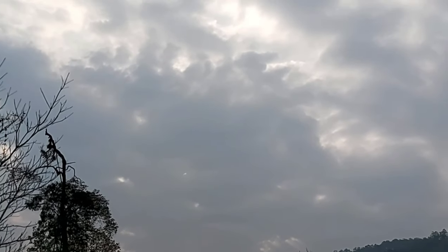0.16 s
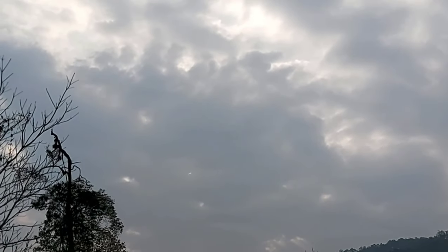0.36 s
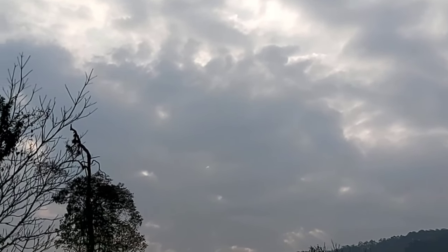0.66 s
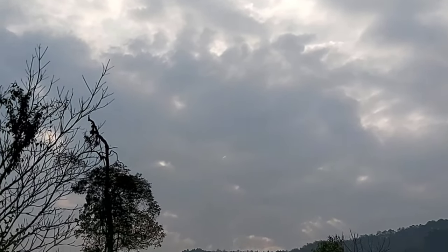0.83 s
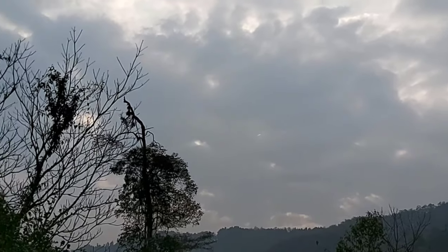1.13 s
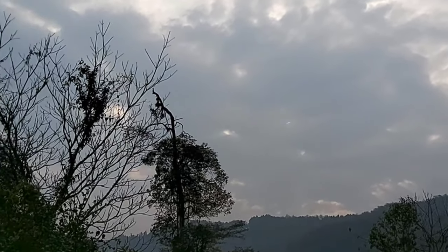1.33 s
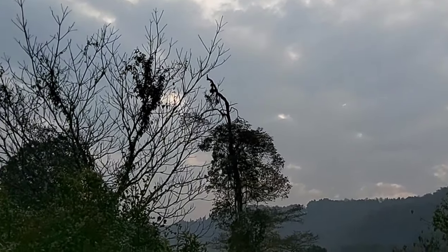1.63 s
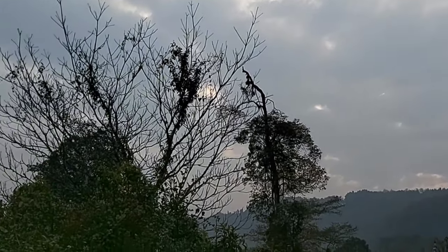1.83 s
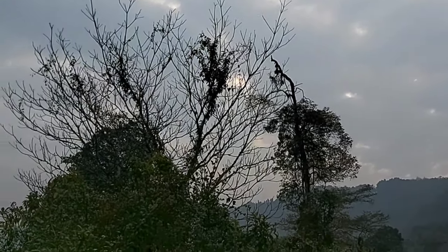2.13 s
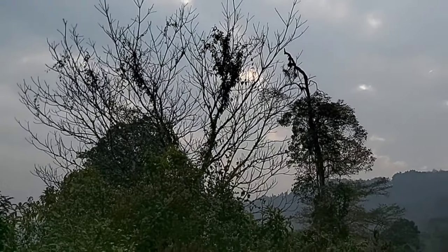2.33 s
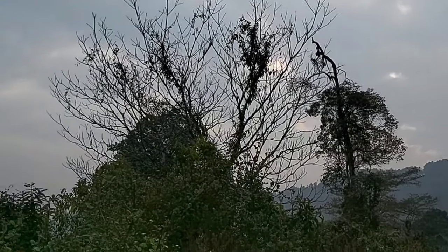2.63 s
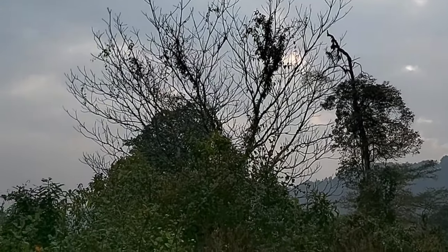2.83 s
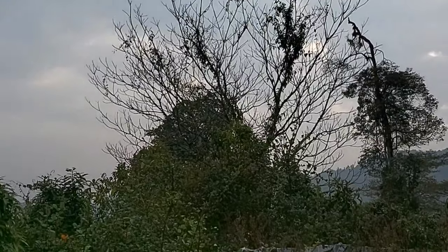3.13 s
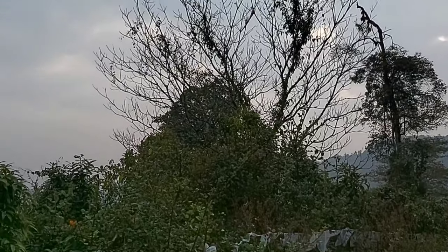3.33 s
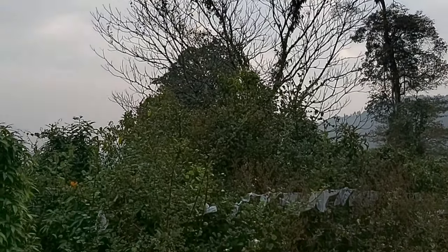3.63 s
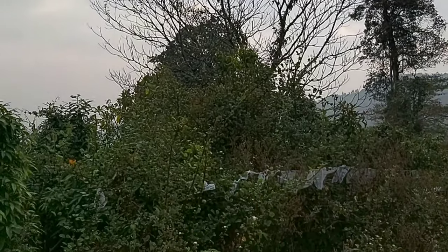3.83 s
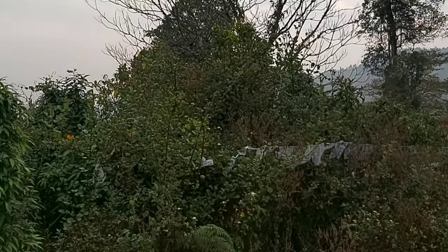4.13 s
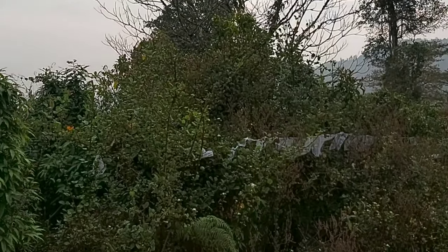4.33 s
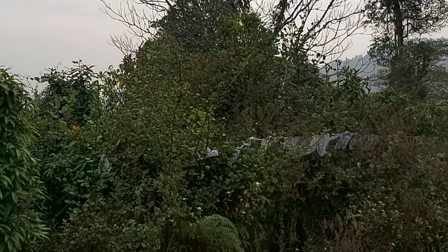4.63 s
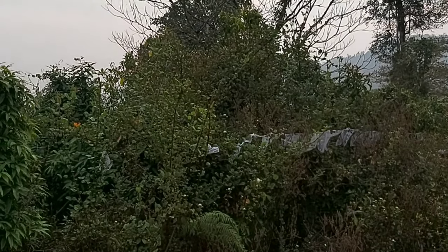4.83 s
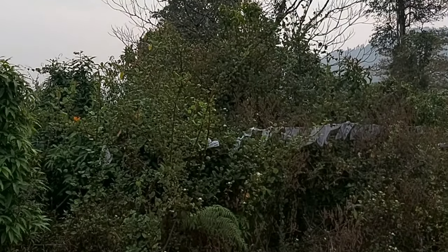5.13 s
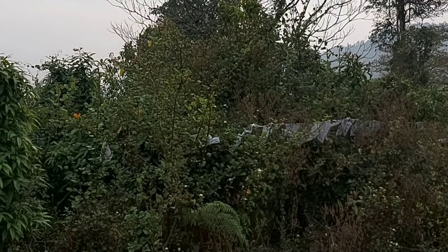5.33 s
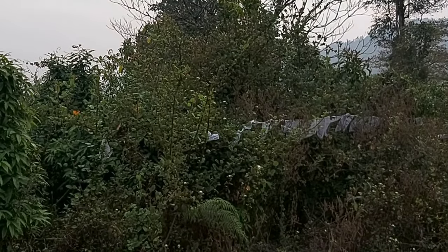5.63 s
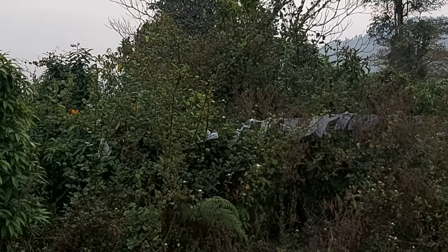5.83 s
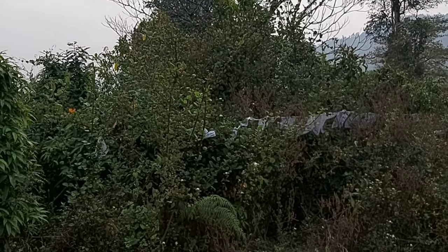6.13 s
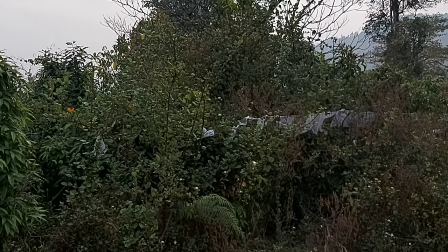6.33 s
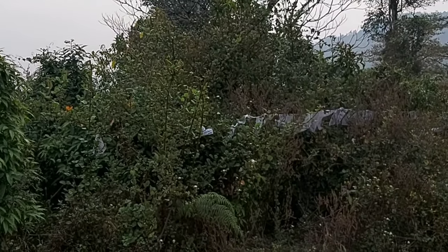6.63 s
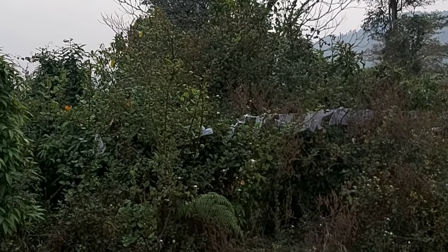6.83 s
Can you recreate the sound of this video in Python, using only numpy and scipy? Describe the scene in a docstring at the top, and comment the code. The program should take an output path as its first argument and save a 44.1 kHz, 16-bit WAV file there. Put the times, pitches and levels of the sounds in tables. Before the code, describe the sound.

Thrush-like birds whistle and warble close by without pause, roosters crow down the slope early on, and wind thumps the handheld microphone.

```python
"""A wooded hillside in the morning, heard by a handheld phone: thrush-like whistlers and a thin high warbler
sing close by, roosters crow down the slope, far birds blur among the trees and gusts thump the microphone.
Voices are sines that follow tables of pitch and level, with their pitch and level shaken by random walks.
Wind, hush, breath and scolds are shaped noise; the trees and the ground add delayed copies of the voices."""
import sys
import numpy as np
from scipy import signal
from scipy.fft import rfft, irfft
from scipy.io import wavfile
from scipy.ndimage import uniform_filter1d

SR = 44100
rng = np.random.default_rng(int(sys.argv[2]) if len(sys.argv) > 2 else 0)


def inscribe(sig):
    """Save sig as 16-bit PCM at rate SR to the path in sys.argv[1].

    A 1-D sig is mono; a 2-D sig holds one channel per row.
    Samples are clipped to [-1, 1] before scaling.
    """
    pcm = np.round(np.clip(np.atleast_2d(sig).T, -1, 1) * 32767)
    wavfile.write(sys.argv[1], SR, pcm.astype(np.int16))


N = 307377
T = np.arange(N) / SR  # time [s]

# spectrum of the steady hush: (frequency [Hz], relative density [dB per Hz])
AIR_SPECTRUM = [(20, -30), (35, 2), (70, -2), (200, -7), (320, -4), (500, -11), (950, -16.5), (1400, -12.5),
                (2500, -9), (4000, -22), (7000, -28.5), (8500, -32), (12200, -24.5), (15400, -26.5)]
AIR_DB = -64.5

# gusts on the microphone: (arrival [s], duration [s], level [dB])
GUSTS = [(1.55, 0.29, -51), (1.905, 0.05, -50.5), (1.981, 0.2, -42.5), (2.406, 0.08, -59),
         (3.1, 0.13, -68.5), (3.414, .22, -49), (3.766, 0.13, -60), (5.874, 0.049, -57.5)]
GUST_RISE_S, GUST_FALL_S, BREEZE_DB = 0.0028, 0.041, -78.5
# single puffs on the microphone: (time [s], level [dB])
THUMPS = [(1.038, -45.5), (1.183, -52), (1.831, -23), (1.876, -37), (5.84, -43)]
THUMP_HZ, THUMP_S = 70, .0062

# crowds of far singers: (time [s], hooting voices [dB], low voices [dB], high voices [dB])
CHORUS_LEVELS = [(0, -74, -57, -77), (0.7, -59, -62.5, -81.5), (1.2, -54, -49, -75.5),
                 (1.599, -59, -52.5, -72), (1.999, -56.5, -55.5, -78.5), (2.599, -57, -63, -80.5),
                 (3.301, -63, -70, -71.5), (4.001, -66.5, -59, -61), (4.599, -59, -60, -63.5),
                 (5.2, -73, -57, -83.5), (5.6, -62.5, -58.5, -66), (5.95, -77, -66.5, -90),
                 (6.4, -73, -80, -82), (6.97, -70, -79, -75.5)]
# bouts of thin far twitter: (start [s], end [s], level [dB])
TWITTER_BOUTS = [(.8, 1.8, -80.5), (2.9, 3.2, -83), (5.87, 6.55, -76), (6.68, 7, -73)]
BOUT_EDGE_S, TWITTER_REST_DB = 0.042, -85.5

# far hoots, mostly falling: (start [s], end [s], first pitch [Hz], last pitch [Hz], level [dB])
HOOTS = [(0.0, 0.2, 1274, 1387, -62.5), (2.97, 3.12, 1657, 1340, -66.5), (3.2, 3.44, 1397, 1304, -65.5),
         (3.42, 3.6, 1486, 1300, -70), (3.9, 4.03, 1567, 1180, -66), (4.3, 4.45, 1413, 1285, -67.5),
         (4.5, 4.72, 1338, 1170, -65), (4.8, 4.95, 1535, 1190, -68.5), (5.23, 5.38, 1537, 1346, -64),
         (5.4, 5.58, 1360, 1355, -66), (5.6, 5.74, 1310, 1260, -72.5), (5.68, 5.85, 1550, 1174, -73),
         (6.08, 6.16, 1330, 1080, -70.5), (6.08, 6.2, 1494, 1436, -69), (6.36, 6.48, 1407, 1153, -69),
         (6.48, 6.68, 1340, 1374, -67.5), (6.55, 6.64, 1446, 1490, -67.5), (6.7, 6.8, 1380, 1176, -65)]
# far thin seeps: (start [s], end [s], first pitch [Hz], last pitch [Hz], level [dB])
SEEPS = [(0.79, 0.84, 4280, 4400, -73), (1.01, 1.09, 3670, 3850, -67.5), (1.12, 1.2, 4470, 4310, -70.5),
         (2.45, 2.55, 4870, 4680, -72.5), (2.79, 2.86, 5510, 4820, -61), (6.05, 6.1, 5930, 5460, -72),
         (6.14, 6.2, 6400, 6380, -70), (6.53, 6.63, 5330, 5700, -71), (6.67, 6.75, 7260, 5820, -70)]

# near syllables, three tables with the same columns: clean whistles, burry notes, high warbles
# (start [s], turn [s], end [s], first pitch [Hz], turn pitch [Hz], last pitch [Hz], level at the turn [dB])
WHISTLES = [ (.004, .02, .05, 2080, 2300, 2424, -46.5), (.05, .06, .082, 2320, 2310, 2210, -45),
            (.092, .105, .2, 2350, 2400, 2335, -47.5), (.198, .208, .255, 2753, 2895, 2810, -47),
            (.255, .266, .3, 2890, 3005, 2190, -43), (.2, .245, .28, 2490, 2455, 2540, -50),
            (.225, .29, .338, 3190, 3160, 3120, -50.5), (.335, .355, .38, 2140, 2160, 1840, -58),
            (.343, .37, .43, 2550, 3000, 3140, -47.5), (.512, .525, .552, 2130, 2346, 2040, -46.5),
            (.68, .7, .72, 1850, 2120, 1810, -57), (.876, .884, .92, 2570, 2713, 2730, -44),
            (.95, .997, 1.035, 2880, 3077, 2610, -43.5), (1.04, 1.05, 1.065, 3120, 2970, 2710, -42.5),
            (1.035, 1.045, 1.056, 2034, 2107, 2070, -47), (1.069, 1.082, 1.122, 2825, 3100, 2540, -45),
            (1.15, 1.165, 1.177, 3150, 2690, 2520, -38.5), (1.21, 1.235, 1.262, 2980, 2510, 2013, -41.5),
            (1.497, 1.527, 1.604, 2527, 2688, 2576, -35), (1.53, 1.562, 1.64, 1623, 2104, 2090, -42),
            (1.69, 1.706, 1.716, 2247, 2523, 2340, -44), (1.716, 1.724, 1.747, 2280, 2250, 2120, -38.5),
            (1.754, 1.763, 1.772, 2274, 2478, 2295, -51), (1.772, 1.8, 1.848, 2344, 2812, 2670, -36.5),
            (1.848, 1.86, 1.913, 2616, 2690, 2810, -43), (1.808, 1.822, 1.835, 2960, 2990, 3180, -41.5),
            (1.91, 1.942, 1.98, 1790, 2120, 1770, -56), (2.1, 2.12, 2.155, 2488, 2650, 2090, -38),
            (2, 2.018, 2.026, 2430, 2312, 2450, -42), (2.026, 2.034, 2.08, 2500, 2650, 2130, -39),
            (2.135, 2.15, 2.165, 2660, 2858, 2780, -39.5), (2.165, 2.18, 2.195, 2750, 2842, 2770, -38),
            (2.195, 2.21, 2.22, 2780, 2900, 2865, -39.5), (2.222, 2.237, 2.276, 2850, 2956, 2670, -42),
            (2.172, 2.191, 2.21, 2158, 2250, 2350, -44.5), (2.384, 2.399, 2.413, 2515, 2735, 2770, -41.5),
            (2.425, 2.442, 2.49, 2754, 2585, 2645, -40.5), (2.396, 2.415, 2.45, 2160, 2334, 2045, -36),
            (2.515, 2.53, 2.55, 2230, 2690, 3140, -47), (2.55, 2.575, 2.667, 3060, 3072, 3164, -46.5),
            (2.712, 2.725, 2.762, 3073, 3070, 2020, -45), (2.5, 2.55, 2.7, 1530, 2030, 1884, -52.5),
            (2.83, 2.91, 2.96, 1600, 1940, 1940, -49), (2.96, 3, 3.08, 1908, 1874, 1920, -52.5),
            (3.08, 3.15, 3.3, 1920, 1915, 1750, -52.5), (3.085, 3.11, 3.125, 2880, 2880, 2780, -44.5),
            (3.185, 3.23, 3.254, 2880, 2848, 2830, -33), (3.366, 3.384, 3.39, 2320, 2137, 2030, -36),
            (3.395, 3.42, 3.462, 1926, 1914, 1870, -44.5), (3.866, 3.881, 3.9, 2884, 2790, 2490, -32.5),
            (3.9, 3.933, 3.964, 2593, 2452, 2403, -26), (4.098, 4.104, 4.113, 1926, 2220, 2810, -42),
            (4.113, 4.127, 4.135, 2960, 3550, 3530, -55), (4.135, 4.142, 4.148, 3510, 3360, 3110, -37.5),
            (4.148, 4.155, 4.185, 3180, 3173, 2870, -35), (4.196, 4.212, 4.245, 2960, 2620, 2440, -37),
            (4.274, 4.292, 4.298, 2236, 2552, 2700, -31.5), (4.298, 4.312, 4.322, 2710, 2720, 2600, -33.5),
            (4.33, 4.346, 4.41, 2770, 2713, 2784, -34), (4.49, 4.52, 4.54, 2083, 2285, 2390, -31.5),
            (4.54, 4.551, 4.562, 2450, 2455, 2680, -29), (4.562, 4.575, 4.589, 2960, 3080, 3320, -37),
            (4.617, 4.626, 4.64, 2864, 2114, 2686, -36), (4.64, 4.662, 4.677, 2704, 2450, 2100, -30),
            (4.699, 4.711, 4.726, 1757, 2206, 2153, -36.5), (4.892, 4.907, 4.953, 2184, 2700, 2724, -32.5),
            (4.962, 4.985, 5, 2830, 2977, 2743, -31), (5.003, 5.021, 5.03, 2867, 3070, 2790, -35),
            (5.082, 5.09, 5.112, 2130, 2130, 2100, -50.5), (5.118, 5.15, 5.185, 2133, 2104, 2014, -39),
            (5.42, 5.512, 5.552, 1600, 2088, 1904, -41), (5.555, 5.57, 5.61, 1978, 1945, 1717, -46.5),
            (5.615, 5.63, 5.65, 1997, 1913, 1955, -47.5), (5.55, 5.57, 5.595, 2490, 2330, 2250, -59),
            (5.505, 5.52, 5.545, 3540, 3300, 2650, -58), (5.7, 5.72, 5.76, 2900, 2790, 2100, -52.5),
            (5.795, 5.813, 5.847, 3010, 2980, 2800, -53), (6.018, 6.043, 6.08, 2580, 2683, 2654, -44.5),
            (6.08, 6.108, 6.147, 2660, 2660, 3060, -43), (6.175, 6.187, 6.22, 2340, 2580, 2273, -47.5),
            (6.22, 6.278, 6.325, 2280, 2662, 2210, -42), (6.417, 6.465, 6.478, 2550, 2467, 2472, -42.5),
            (6.478, 6.5, 6.53, 2383, 3047, 3116, -43), (6.57, 6.59, 6.664, 3186, 3146, 2710, -43),
            (6.715, 6.73, 6.742, 2380, 2260, 2050, -56), (6.769, 6.804, 6.825, 1980, 2324, 2323, -43.5),
            (6.825, 6.86, 6.91, 2184, 2295, 2560, -40)]
BURRS = [ (0.434, 0.452, .475, 2106, 2590, 2820, -45.5), (0.477, 0.489, .505, 2743, 2705, 2680, -48.5),
         (0.514, 0.536, .57, 2640, 2800, 2650, -49), (0.573, 0.599, .603, 2560, 2370, 2530, -47),
         (0.595, 0.627, .673, 2560, 2520, 2357, -42.5), (1.118, 1.133, 1.151, 3014, 3200, 3066, -53),
         (1.176, 1.19, 1.2, 2544, 2550, 2640, -39.5), (1.377, 1.398, 1.411, 2570, 2670, 3424, -47),
         (1.411, 1.424, 1.464, 3424, 2750, 3010, -44), (3.105, 3.157, 3.19, 2720, 2454, 2855, -39),
         (3.194, 3.212, 3.255, 4530, 4790, 3970, -46.5), (3.567, 3.593, 3.6, 2490, 2212, 2330, -36.5),
         (3.602, 3.628, 3.665, 2272, 2410, 1960, -32.5), (3.826, 3.855, 3.862, 2220, 2700, 3020, -40.5),
         (5.022, 5.032, 5.046, 3820, 3510, 3500, -39.5), (5.122, 5.14, 5.148, 2896, 2834, 2570, -33.5),
         (5.147, 5.166, 5.185, 2600, 2368, 2080, -31), (5.221, 5.239, 5.25, 2500, 2230, 2640, -31),
         (5.248, 5.267, 5.301, 2700, 3053, 3014, -31), (5.664, 5.756, 5.95, 1960, 2000, 1980, -54.5),
         (6.523, 6.549, 6.57, 3080, 3190, 3230, -42), (6.745, 6.783, 6.82, 2220, 2696, 2810, -47),
         (6.828, 6.854, 6.887, 2750, 2760, 2650, -50)]
WARBLES = [ (2.635, 2.667, 2.7, 4550, 4940, 4330, -62), (2.7, 2.725, 2.74, 4200, 4520, 4630, -54),
           (2.91, 2.968, 3.001, 4480, 5370, 5020, -54.5), (3.032, 3.07, 3.086, 4840, 4900, 4520, -55),
           (3.086, 3.115, 3.155, 4350, 5115, 4240, -50), (3.304, 3.334, 3.37, 4490, 4900, 4880, -51),
           (3.349, 3.356, 3.364, 4350, 3860, 4030, -38.5), (3.37, 3.398, 3.408, 5010, 4740, 4750, -48),
           (3.462, 3.526, 3.563, 4150, 4660, 4980, -44.5), (3.613, 3.637, 3.65, 4580, 4190, 4550, -46),
           (3.65, 3.66, 3.672, 4470, 4690, 4800, -46.5), (3.715, 3.753, 3.797, 5050, 4550, 4350, -48),
           (3.861, 3.9, 3.945, 4000, 4370, 3790, -49), (3.945, 3.963, 3.997, 3740, 4744, 4390, -48),
           (4.078, 4.088, 4.095, 4950, 5310, 3820, -58.5), (4.095, 4.126, 4.157, 3750, 4280, 3520, -48.5),
           (4.195, 4.215, 4.234, 3520, 3950, 3430, -47), (4.33, 4.338, 4.352, 5120, 4800, 4330, -51.5),
           (4.352, 4.38, 4.41, 4300, 4420, 4700, -50), (4.469, 4.5, 4.529, 3930, 4300, 4670, -51),
           (4.529, 4.54, 4.555, 4730, 5320, 4410, -51.5), (4.555, 4.568, 4.58, 4160, 4100, 3750, -44),
           (4.642, 4.701, 4.72, 4650, 4125, 3970, -41), (4.78, 4.81, 4.837, 4330, 4375, 4440, -43),
           (4.876, 4.906, 4.928, 3250, 4970, 4460, -46.5), (4.928, 4.936, 4.948, 4450, 3880, 4260, -39),
           (5.278, 5.295, 5.306, 4950, 5120, 5510, -54), (5.306, 5.318, 5.332, 5380, 4430, 4610, -45.5),
           (5.332, 5.338, 5.345, 4570, 4960, 5400, -68), (5.345, 5.358, 5.378, 5300, 4700, 4470, -49),
           (5.51, 5.54, 5.555, 4020, 4480, 4550, -42.5)]
# tiny high chips: (start [s], end [s], first pitch [Hz], last pitch [Hz], level [dB])
CHIPS = [(2.925, 2.945, 7150, 7300, -68.5), (2.965, 2.985, 7050, 7300, -63), (3.005, 3.03, 6970, 7270, -65),
         (3.04, 3.075, 7060, 7060, -68)]
# trills: (start [s], end [s], centre pitch [Hz], pitch swing [Hz], level [dB], beat rate [1/s])
TRILLS = [(4.288, 4.348, 5000, 240, -51, 100), (4.988, 5.022, 4200, 300, -40.5, 135),
          (5.105, 5.213, 4724, 470, -44.5, 48.5), (5.446, 5.506, 4110, 352, -50, 75)]
# a syllable swells up to its turn and fades after it, the deeper the longer it has
SWELL_DB, SWELL_S, FADE_DB, FADE_S = 12, 0.029, 13, 0.041
JOIN_S, SLUR_LIFT_DB = .004, 2  # a smaller gap than this slurs two syllables; lift where they join
ARCH = 0.7  # share of the glide next to a top that lies in its outer half
CLEAR_DB, HAZE_PER_DB = -43, .05  # fainter whistles come through leaves and shake more

# overtones of the near whistlers: (multiple of pitch [1], level [dB])
OVERTONES = [(2, -30.5), (4, -33), (5, -38.5)]
# gain of the near song's overtones: (time [s], level [dB])
FACING = [(3.0, -26), (3.6, 2.5), (3.95, -10), (4.3, 3.5), (4.6, 3.5), (5.3, -1), (5.6, -7)]

# short rough opening syllables of the lower rooster, a list for each: (time [s], pitch [Hz], level [dB])
CROW_START = [
    [(0.54, 535, -65), (0.6, 540, -59.5), (.71, 541, -70)],
    [(0.75, 559, -51.5), (0.81, 648, -48.5), (0.87, 676, -61)],
    [(0.84, 562, -62), (0.96, 606, -44.5), (1.03, 693, -56)],
    [(1.24, 667, -58), (1.3, 625, -44.5), (1.4, 578, -56.5)],
]
# long crow of the lower rooster: (time [s], pitch [Hz], level [dB])
LONG_CROW = [(1.4, 573, -53), (1.49, 566, -52.5), (1.88, 556, -57.5), (1.946, 565, -54), (2.04, 554, -57),
             (2.082, 540, -49.5), (2.16, 548.4, -57), (2.27, 528, -60), (2.418, 514.4, -59.5),
             (2.52, 518, -59.5), (2.6, 512, -81)]
# crow of the higher rooster: (time [s], pitch [Hz], level [dB])
HIGH_CROW = [(0.76, 690, -66), (0.784, 717, -50), (0.846, 712, -43), (0.876, 714, -64), (.924, 718, -51),
             (.956, 700.6, -61), (1.026, 712, -37.5), (1.062, 710.5, -51), (1.092, 714.3, -42),
             (1.16, 715.8, -46.5), (1.198, 717, -39), (1.33, 720, -49.5), (1.42, 717, -53)]
# thinning end of the higher crow: (time [s], pitch [Hz], level [dB])
HIGH_TAIL = [(1.4, 700, -65.5), (1.6, 712, -52.5), (1.95, 696, -67.5)]
# long falling cry from far off, perhaps a third rooster: (time [s], pitch [Hz], level [dB])
FAR_CROW = [(1.56, 1690, -54.5), (1.68, 1635, -57), (1.95, 1627, -56), (2.3, 1543, -58), (2.55, 1490, -64),
            (2.76, 1370, -73)]
# partials of the opening syllables: (multiple of pitch [1], level [dB])
START_ORDERS = [(1, -0.5), (3, -9.5)]
# partials of the long crow, with a line between the first two harmonics: (multiple of pitch [1], level [dB])
LONG_ORDERS = [(1, 0), (1.5, -13), (2, -17)]
# partials of the higher crow: (multiple of pitch [1], level [dB])
HIGH_ORDERS = [(1, 0), (2, -11), (3, -20), (4, -22), (6, -36)]
# partials of its thinning end, the second strongest: (multiple of pitch [1], level [dB])
TAIL_ORDERS = [(1, -17), (2, 0)]

# harsh noisy scolds: (start [s], end [s], low edge [Hz], high edge [Hz], level [dB])
SCOLDS = [(0.754, 0.874, 2070, 2650, -43.5), (1.338, 1.484, 2460, 3300, -48),
          (3.314, 3.39, 2400, 3840, -51), (4.114, 4.218, 4870, 7960, -69.5), (5, 5.047, 2470, 3860, -37),
          (4.963, 5.047, 5100, 7460, -64), (5.598, 5.685, 3920, 8500, -70)]

TOP_HZ = 15550  # upper limit of the phone


def undb(db):
    """Logarithmic levels: decibels become an amplitude gain."""
    return 10 ** (np.asarray(db) / 20)


def unit(x):
    """Power normalisation: the signal is scaled to rms 1."""
    return x / np.sqrt(np.mean(x ** 2))


def walk(rate):
    """Slow random modulation: levels held for 1 / rate seconds, smoothed twice, rms 1."""
    k = int(SR / rate)
    steps = np.repeat(rng.standard_normal(N // k + 1), k)
    smooth = uniform_filter1d(uniform_filter1d(steps, k), k)
    return unit(smooth[:N])


def band(x, lo_hz, hi_hz):
    """Resonant selection: a Butterworth band-pass keeps the range between two frequencies."""
    sos = signal.butter(2, [lo_hz, hi_hz], "bandpass", fs=SR, output="sos")
    return signal.sosfilt(sos, x)


def bouts(table, rise_s, fall_s, rest_db):
    """Envelope superposition: each (start, end, dB) rises linearly, holds and decays, over a resting level."""
    gain = undb(rest_db)
    for start, end, db in table:
        rise = np.clip((T - start) / rise_s, 0, 1)
        decay = np.exp(-np.maximum(T - end, 0) / fall_s)
        gain = gain + undb(db) * rise * decay
    return gain


def sing(notes, orders=((1, 0),), edge_s=0.0055, swing=None, rasp=None, effort=0., haze=0.):
    """Frequency and amplitude modulation: a syrinx follows each note's pitch and level.

    Swing bends the pitch [Hz] and rasp shakes the level [gain]; effort makes the sound grow faster
    than the written level, and haze deepens the rasp of faint notes."""
    out = np.zeros(N)
    for note in notes:
        s, hz, db = np.transpose(note)
        span = slice(max(int((s[0] - edge_s) * SR), 0), int((s[-1] + edge_s) * SR))
        t = T[span]
        # the muscles round off the corners of a glide
        pitch = uniform_filter1d(np.interp(t, s, hz), size=200, mode="nearest")
        if swing is not None:
            pitch = pitch + swing[span]
        phase = 2 * np.pi * np.cumsum(pitch) / SR
        tone = sum(undb(d) * np.sin(k * phase) * (k * pitch < .45 * SR) for k, d in orders)
        to_edge = np.minimum(t - t[0], t[-1] - t)
        edge = np.sin(np.pi / 2 * np.clip(to_edge / (2 * edge_s), 0, 1)) ** 2
        level = np.interp(t, s, db)
        gain = undb(level + effort * (level + 34.5))  # written and sounded levels agree at -34.5 dB
        shake = 1
        if rasp is not None:
            depth = 1 + haze * max(CLEAR_DB - db.max(), 0)
            shake = unit(rasp[span] ** depth)
        out[span] += np.sqrt(2) * tone * edge * gain * shake
    return out


def glides(table):
    """Linear frequency sweep: each row becomes a straight glide at a constant level."""
    return [[(a, hz0, db), (b, hz1, db)] for a, b, hz0, hz1, db in table]


def syllables(table):
    """Curved frequency sweep: glides swell to the turn, fade after it and run on into a close next one."""
    notes = []
    for a, m, b, hz0, hz1, hz2, db in table:
        done = ARCH if hz1 > max(hz0, hz2) else .5  # round over a top, straight otherwise
        first = db - SWELL_DB * (1 - np.exp((a - m) / SWELL_S))
        last = db - FADE_DB * (1 - np.exp((m - b) / FADE_S))
        note = [(a, hz0, first),
                ((a + m) / 2, hz0 + done * (hz1 - hz0), (first + db) / 2),
                (m, hz1, db),
                ((m + b) / 2, hz2 + done * (hz1 - hz2), (last + db) / 2),
                (b, hz2, last)]
        if notes and abs(a - notes[-1][-1][0]) < JOIN_S:
            s, hz, before_db = notes[-1].pop()
            joint = (s, (hz + hz0) / 2, max(before_db, first) + SLUR_LIFT_DB)
            notes[-1] += [joint] + note[1:]
        else:
            notes.append(note)
    return notes


def trees(x, t60_s, wet_db, echo_db):
    """Diffuse scattering: trunks and leaves return a decaying noise tail and five distinct early echoes."""
    t = T[:SR]
    decay = np.exp(-np.log(1000) * t / t60_s)
    tail = rng.standard_normal(SR) * decay * np.clip(t / 0.023, 0, 1)
    tail *= undb(wet_db) / np.sqrt(np.sum(tail ** 2))
    tail[rng.integers(100, 1500, size=5)] += undb(echo_db) * rng.choice([-1, 1], size=5)
    return signal.fftconvolve(x, tail)[:N]


def bounce(x, lag_s, db):
    """Comb interference: gliding notes beat against one strong late copy from the ground."""
    k = int(lag_s * SR)
    return x + undb(db) * np.r_[np.zeros(k), x[:-k]]


def air():
    """Spectrally shaped noise: steady hillside hush and microphone hiss."""
    hz, db = np.transpose(AIR_SPECTRUM)
    f = np.maximum(np.fft.rfftfreq(N, 1 / SR), 1)
    shape = undb(np.interp(np.log(f), np.log(hz), db))
    return unit(irfft(rfft(rng.standard_normal(N)) * shape, N)) * undb(AIR_DB)


def wind():
    """Membrane displacement by moving air: gusts rumble low and uneven, a sharp puff swings once or twice."""
    rumble = band(band(rng.standard_normal(N), 38, 95), 32, 125)
    gusts = [(start, start + length, db) for start, length, db in GUSTS]
    v = unit(rumble * undb(5.2 * walk(25.03))) * bouts(gusts, GUST_RISE_S, GUST_FALL_S, BREEZE_DB)
    for start, db in THUMPS:
        t = np.maximum(T - start, 0)
        pulse = (t / THUMP_S / 2) ** 2 * np.exp(2 - t / THUMP_S)  # reaches 1 after 2 * THUMP_S
        v += undb(db) * pulse * np.sin(2 * np.pi * THUMP_HZ * t)
    return v


def crowd(count, lo_hz, hi_hz):
    """Random superposition: many short glides from birds too far to tell apart."""
    at, place, length, bend, size = rng.random((count, 5)).T
    start = at * 6.8
    end = start + .02 + .09 * length
    hz = lo_hz * (hi_hz / lo_hz) ** place
    rows = np.c_[start, end, hz, hz * (.75 + .4 * bend), -8 * size]
    return sing(glides(rows), edge_s=.012, swing=60 * walk(100))


def chorus():
    """Reverberant blending: hooting, low, high and thin far voices come much by way of the trees."""
    s, hoot_db, low_db, high_db = np.transpose(CHORUS_LEVELS)
    twitter = crowd(count=1200, lo_hz=6300, hi_hz=7740) * undb(3 * walk(500))
    layers = ((crowd(count=200, lo_hz=1307, hi_hz=1816), undb(np.interp(T, s, hoot_db))),
              (crowd(count=420, lo_hz=1871, hi_hz=3166), undb(np.interp(T, s, low_db))),
              (crowd(count=260, lo_hz=3663, hi_hz=4940), undb(np.interp(T, s, high_db))),
              (twitter, bouts(TWITTER_BOUTS, BOUT_EDGE_S, BOUT_EDGE_S, TWITTER_REST_DB)))
    return sum(unit(0.48 * voices + trees(voices, 0.59, 0, -19)) * gain for voices, gain in layers)


def far_hoots():
    """Slow frequency sweep: soft-edged hoots from down the slope."""
    return sing(glides(HOOTS), edge_s=.015, swing=15 * walk(30), rasp=undb(0.53 * walk(40)))


def far_seeps():
    """Fast random modulation: it makes thin high tones from down the slope rough."""
    return sing(glides(SEEPS), edge_s=0.009, swing=90 * walk(400), rasp=undb(3.5 * walk(200)))


def whistlers():
    """Ground reflection: clean whistles and fast-shaken burry notes sound low over the ground."""
    v = sing(syllables(WHISTLES), swing=18 * walk(90), rasp=undb(2 * walk(150)), haze=HAZE_PER_DB)
    v += sing(syllables(BURRS), swing=40 * walk(250), rasp=undb(4.5 * walk(350)))
    return bounce(v, 0.0065, -10.5)


def overtones():
    """Harmonic distortion with effort: loud notes carry overtones and breath, the microphone port lifts the top."""
    v = sing(syllables(WHISTLES + BURRS), OVERTONES,
             swing=20 * walk(270), rasp=undb(6.6 * walk(440)), effort=0.48)
    # breath hiss rides on the loudness of the overtones
    v += 0.62 * uniform_filter1d(np.abs(v), size=400) * rng.standard_normal(N)
    v += trees(v, 0.15, -4, -17)
    port = band(band(v, 10900, 13200), 9500, 14800)
    v = undb(-8) * band(v, 5200, 6800) + port
    return v * undb(np.interp(T, *np.transpose(FACING)))


def roosters():
    """Harmonic stacks with turbulence: hoarse crows and a far cry waver, with throat hiss following their level."""
    v = sing(CROW_START, START_ORDERS, .02, 18 * walk(60), undb(4 * walk(60)))
    v += sing([HIGH_CROW], HIGH_ORDERS, .02, 5 * walk(60), undb(3 * walk(70)))
    v += sing([LONG_CROW], LONG_ORDERS, .03, 4 * walk(50), undb(2.5 * walk(45)))
    v += sing([HIGH_TAIL], TAIL_ORDERS, 0.022, 3 * walk(40.1), undb(5.5 * walk(29.7)))
    v += sing([FAR_CROW], edge_s=.03, swing=8 * walk(39.93), rasp=undb(3.7 * walk(40.05)))
    hiss = unit(band(rng.standard_normal(N), 540, 950))
    return v + .22 * uniform_filter1d(np.abs(v), size=3000) * hiss


def scolds():
    """Amplitude-modulated band noise: harsh bursts chopped by a fast irregular rattle."""
    out = np.zeros(N)
    for a, b, lo_hz, hi_hz, db in SCOLDS:
        edges = np.clip(np.minimum(T - a, b - T) / 0.031, 0, 1)
        noise = band(band(rng.standard_normal(N), lo_hz, hi_hz), lo_hz, hi_hz)
        out += edges * undb(db + 1.8 * walk(150)) * unit(noise)
    return out


def warbler():
    """Direct propagation: thin warbles and chips from high in the crown have no ground echo."""
    return sing(syllables(WARBLES) + glides(CHIPS), swing=18 * walk(90), rasp=undb(0.94 * walk(70)))


def trills():
    """Periodic frequency modulation: the pitch beats about its centre with a swing that widens, then holds."""
    v = np.zeros(N)
    for a, b, hz, swing_hz, db, beats in TRILLS:
        widening = np.clip((T - a) / (0.41 * (b - a)), 0, 1)
        swing = swing_hz * np.cos(2 * np.pi * beats * (T - a)) * widening
        note = [(a, hz, db - 5.5), ((a + b) / 2, hz, db), (b, hz, db - 1.5)]
        v += sing([note], swing=swing + 40 * walk(60))
    return v


def scene():
    """Direct-to-reverberant ratio: near singers stand out of their echo, far ones carry more of it."""
    far = far_hoots() + far_seeps()
    near = whistlers() + scolds() + warbler() + trills()
    crows = roosters()
    sound = near + trees(near, 0.58, -11.5, -18.5)
    sound += far + trees(far, 0.87, -9.5, -14.5)
    sound += crows + trees(crows, .4, -9, -22)
    return (sound + overtones() + chorus() + wind() + air())[None]


def record(dry):
    """Band limitation: the phone's steep elliptic low-pass cuts the top."""
    return signal.sosfilt(signal.ellip(10, .2, 60, TOP_HZ, fs=SR, output="sos"), dry)


dry = scene()
out = record(dry)
inscribe(out)
```